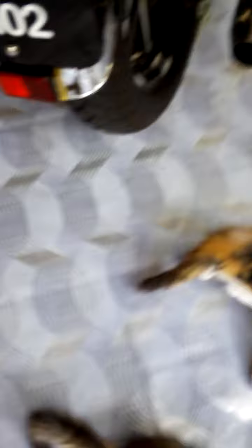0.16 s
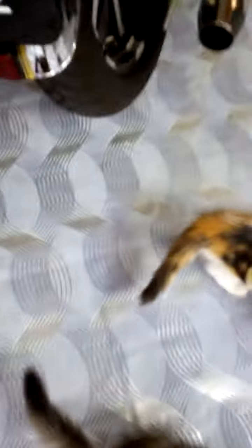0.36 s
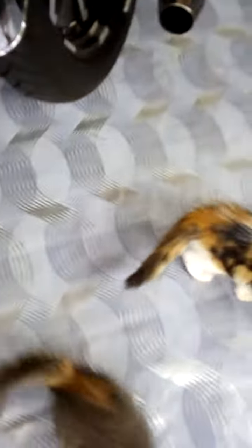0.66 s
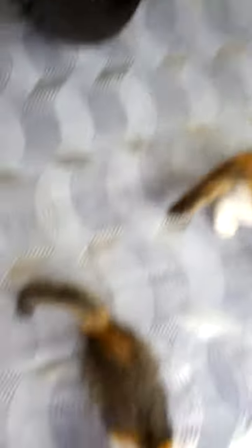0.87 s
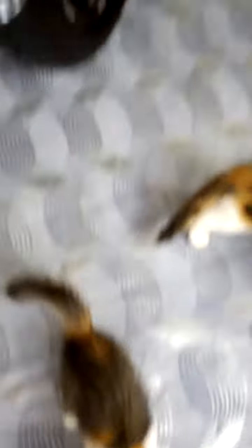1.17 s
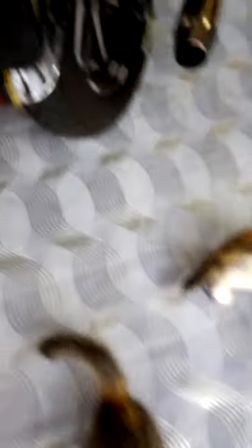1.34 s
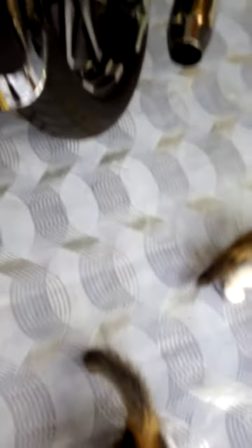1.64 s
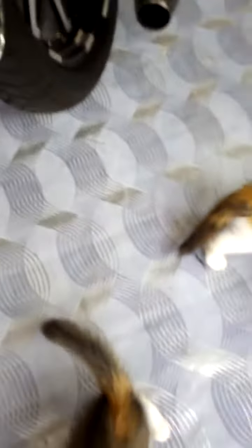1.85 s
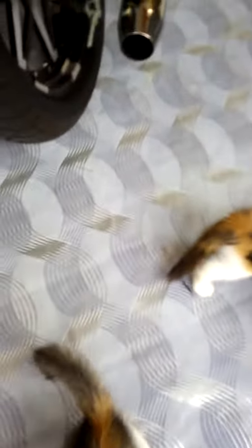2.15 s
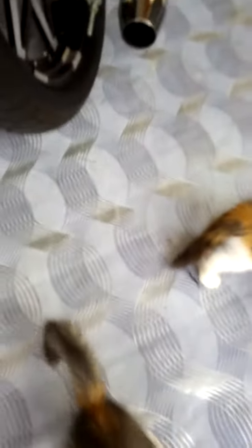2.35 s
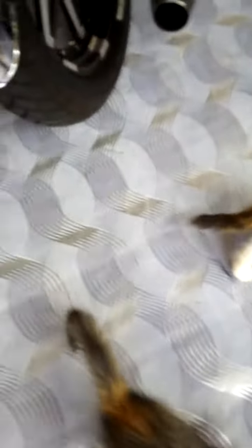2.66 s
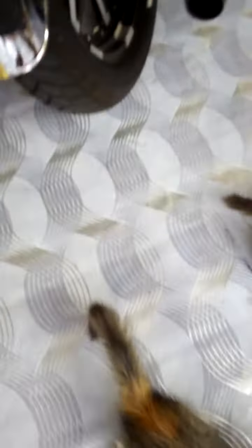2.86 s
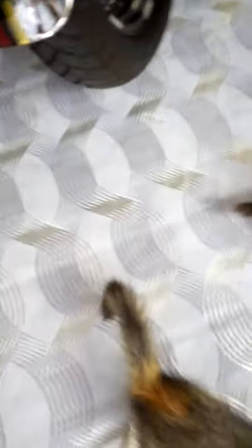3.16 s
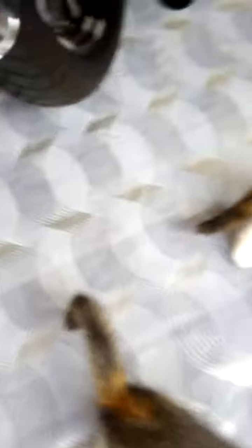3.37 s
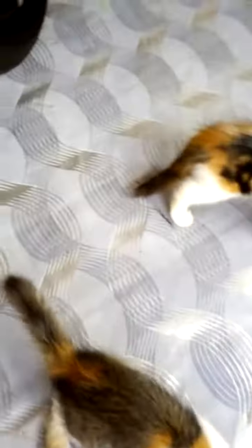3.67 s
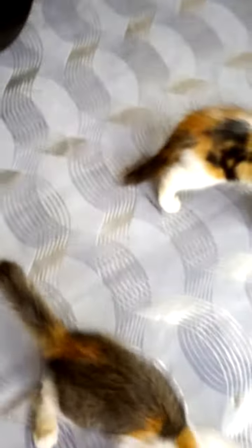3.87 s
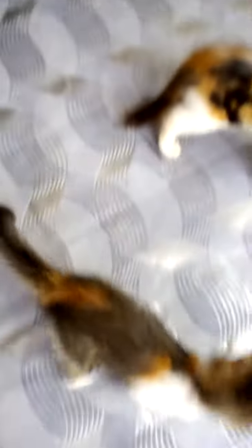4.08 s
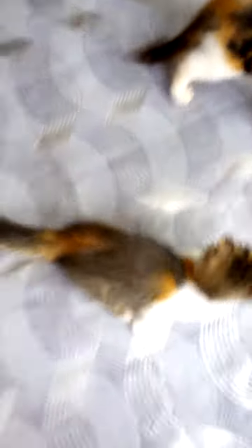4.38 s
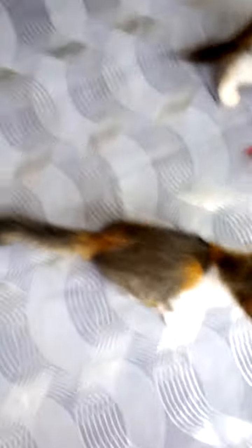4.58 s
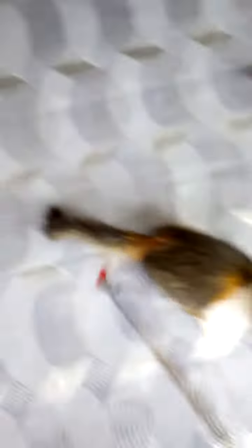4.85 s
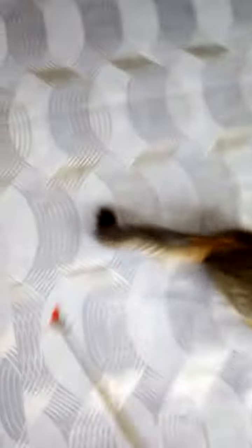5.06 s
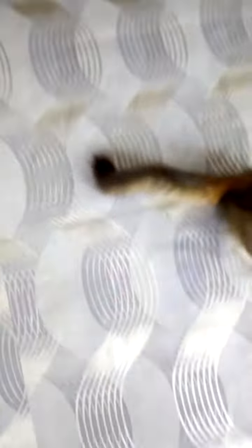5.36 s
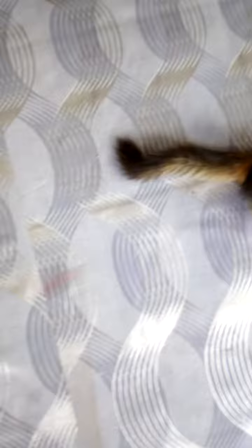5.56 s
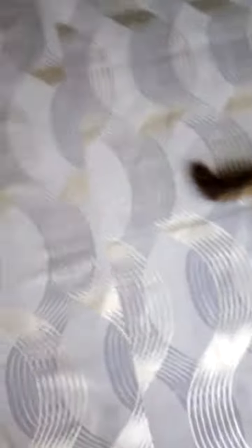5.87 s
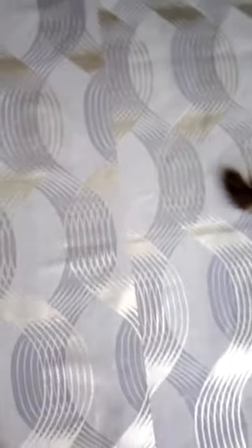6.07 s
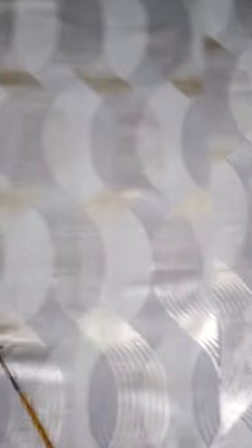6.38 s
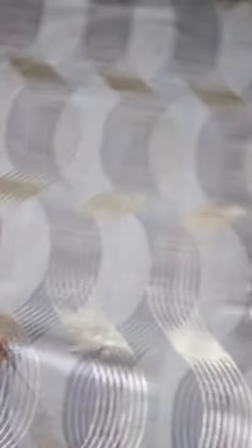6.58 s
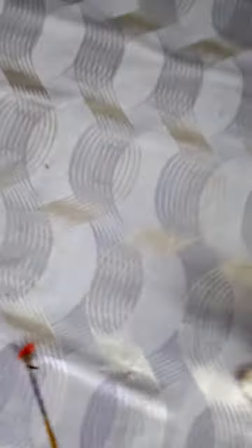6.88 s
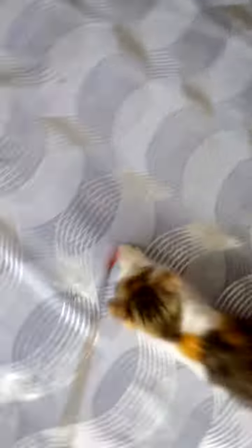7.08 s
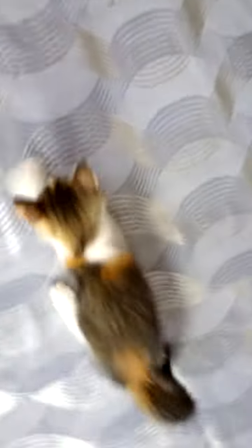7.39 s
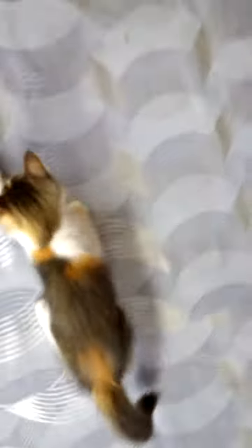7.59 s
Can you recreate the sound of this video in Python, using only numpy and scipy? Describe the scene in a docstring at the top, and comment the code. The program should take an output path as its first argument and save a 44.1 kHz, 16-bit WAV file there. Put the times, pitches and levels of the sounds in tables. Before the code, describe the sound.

A quiet indoor space with a faint low hum and steady soft hiss. At the start there is a soft puff and a slight scrape, then from 0.2 to 0.6 s crisp plastic snaps and short claw scratches. After a pause, sharp crackles at 1.2 s and a scrabbling cluster from 1.45 to 2 s. Brief lighter crinkles come around 2.5 s, with a dull soft paw thud near 2.7. From 3.3 to 3.8 s a dense flurry of scrapes and snaps mixes with a thin high sliding hiss and a slight wavering whistle, fading by about 4.1 s. Only tiny ticks and faint puffs remain until 5.2 s. Then vigorous scratching and bright, hard snaps run almost continuously to 6.6 s. After a short lull, final pounces from 7.1 to 7.6 s crackle with a hollow ring. Close, dry, with short sparse reflections from hard walls.

```python
"""A low hum and a steady background hiss are heard first, with a soft puff, a brief scrape and faint ticks.
Kittens pounce and scrabble on a stiff plastic floor sheet in a small, hard room: creases snap (impulses
through sheet resonances), claws scrape (stick-slip clicks through the same kind of resonances), and
something light slides over the sheet with a thin hiss (a patter of bumps) and a whistle (resonant noise).
Sparse, decaying reflections give the room; the last leaps ring on a hollow fold."""
import sys
import numpy as np
from scipy import signal
from scipy.fft import rfft, irfft
from scipy.io import wavfile
from scipy.ndimage import uniform_filter1d

SR = 44100
rng = np.random.default_rng(int(sys.argv[2]) if len(sys.argv) > 2 else 0)


def wrap_up_sound(samples):
    """Save the sound to the file named by the first command line argument, as 16-bit audio."""
    columns = np.atleast_2d(samples).T
    # keep every value between -1 and 1, then stretch to whole-number steps
    tamed = np.clip(columns, -1, 1)
    steps = np.round(tamed * 32767).astype(np.int16)
    wavfile.write(sys.argv[1], SR, steps)


N = 340893

# steady background hiss: room air, with faint recorder noise near 15 kHz: f/Hz, relative level/dB
BACKGROUND_SPECTRUM = [(15, -49.5), (28, -24.5), (60, -12.5), (102, -4.5), (156, -14.5), (302, -19),
                       (495, -22.5), (774, -24), (1600, -29), (2340, -35), (5980, -36.5), (7700, -50.5),
                       (13500, -52), (15200, -45)]
# partials of the hum: f/Hz, width at half amplitude/Hz, level/dB before the hum trim
HUM_PARTIALS = [(65.4, 25, -66.5), (93.3, 11, -66.5), (109.7, 12, -68.5), (136.6, 5.1, -72),
                (266.2, 51, -75), (620, 18, -103)]
# soft paws land and the loose sheet flaps on the floor: t/s, length/s (cut at 0.4 s), level/dB, f/Hz
PAD_LANDINGS = [(0, 0.079, -61, 1166), (2.687, 0.079, -57.5, 60), (4.295, 0.22, -61, 90),
                (5.761, 0.32, -58.5, 68), (5.951, 0.11, -65.5, 1060), (6.046, 0.12, -64, 577),
                (7.003, 0.091, -57.5, 88.4), (7.298, 0.11, -65, 710), (7.643, 0.51, -65, 275)]
# a paw skids or presses the sheet: t/s, length/s (sounded for 2.3 to 93 ms), level/dB, centre f/Hz
SKIDS = [ (0, 0.027, -41.5, 4300), (0.31, 0.032, -30.5, 4400), (0.436, 0.013, -51, 4100),
         (0.597, 0.014, -32.5, 3220), (0.969, 0.093, -65, 3850), (1.488, 0.028, -35, 2800),
         (1.527, 0.0075, -28, 4100), (1.635, 0.0077, -31, 3600), (1.804, .03, -48.5, 3600),
         (1.83, 0.009, -36, 5000), (1.915, .05, -42.5, 3750), (1.96, 0.021, -33.5, 4000),
         (2.44, 0.01, -53, 5100), (2.451, 0.031, -44.5, 3000), (2.561, 0.029, -50, 3070),
         (3.257, .021, -46.5, 2300), (3.302, 0.041, -39, 4900), (3.389, 0.045, -38, 2900),
         (3.424, 0.019, -29, 4400), (3.518, 0.095, -40.5, 3440), (3.586, 0.056, -32.5, 3510),
         (3.69, 0.068, -34, 3900), (3.756, 0.034, -36, 2700), (4.641, 0.14, -69, 2000),
         (5.2213, 0.0085, -32.5, 3500), (5.377, 0.056, -58, 5000), (5.41, 0.013, -28, 3700),
         (5.444, 0.011, -26.5, 4400), (5.52, 0.0099, -34, 2300), (5.606, .024, -30.5, 3800),
         (5.667, 0.089, -50, 2320), (5.758, 0.05, -40, 3500), (5.778, 0.023, -30, 2900),
         (5.826, 0.037, -41, 2800), (5.958, 0.015, -33, 2800), (6.048, 0.013, -31.5, 1980),
         (6.142, 0.022, -30.5, 3000), (6.303, 0.02, -35, 3300), (6.332, 0.027, -34.5, 3800),
         (6.378, 0.028, -39.5, 3900), (6.476, 0.029, -34, 3900), (6.519, 0.0094, -28.5, 3100),
         (6.562, 0.016, -39, 2400), (6.711, 0.015, -58.5, 2080), (6.958, .068, -68, 4000),
         (7.097, 0.048, -40, 3020), (7.139, 0.023, -31, 2120), (7.332, 0.034, -42.5, 2400),
         (7.43, 0.011, -37.5, 3800), (7.517, 0.027, -33.5, 2080), (7.642, 0.0099, -36, 3450)]
# a crease snaps or a claw taps: t/s, level/dB before the snap trim, centre f/Hz
CREASE_SNAPS = [ (0.2274, -28.5, 3170), (0.2724, -31, 3870), (0.283, -26, 4300), (0.2925, -27, 3100),
                (0.347, -21.5, 4440), (0.9593, -41.5, 3630), (1.1968, -18.5, 4600), (1.202, -26.5, 4300),
                (1.3364, -44, 2540), (1.4637, -18, 3970), (1.5433, -21, 4540), (1.558, -27, 3530),
                (1.6047, -36.5, 3330), (1.653, -27, 4540), (1.7246, -35.5, 3830), (1.845, -27.5, 4160),
                (1.8627, -22, 2860), (1.8797, -32, 3850), (2.4566, -27, 2850), (2.4579, -25.5, 5190),
                (3.3054, -30, 5070), (3.3986, -28.5, 2600), (3.4133, -31, 2850), (3.457, -23.5, 3350),
                (3.6712, -22.5, 4860), (3.7345, -19, 4770), (3.9615, -37.5, 2830), (4.13, -53.5, 4370),
                (4.2928, -46.5, 4700), (4.426, -43, 4800), (4.4664, -39.5, 4550), (5.2336, -21.5, 5200),
                (5.4068, -20, 6740), (5.5278, -18.5, 2880), (5.5887, -19, 4580), (5.9544, -16.5, 4470),
                (6.0437, -23.5, 3900), (6.125, -28, 2700), (6.1603, -20, 4070), (6.304, -24.5, 3620),
                (6.463, -23.5, 3340), (6.8195, -49, 5080), (7.0807, -25, 2900), (7.2999, -33.5, 2480),
                (7.3132, -27, 2500), (7.452, -29, 4000)]
# the harder a crease snaps, the more it cracks outside its own band: snap level/dB, skirt level/dB
CRACK_SKIRT = [(-31.5, -29), (-14.5, -18)]
# weight on the paws, creeping narrow and pouncing wide: t/s, spread/octaves (standard deviation of power)
PAW_WEIGHT = [(0, 0.54), (.33, 0.3), (.6, 0.47), (1.2, .24), (1.46, 0.26), (1.55, 0.32), (2, 0.37),
              (2.46, .1), (2.57, 0.28), (3.3, 0.54), (3.6, 0.24), (3.8, 0.41), (4.6, 0.26), (5.22, 0.3),
              (5.4, 0.61), (6.5, 0.7), (7.7, 0.65)]
# the band in which the plastic radiates: f/Hz, relative level/dB
SHEET_RADIATION = [(300, -14.5), (900, -22.5), (1200, -9.5), (1450, -3.5), (1700, -2.5), (2200, 2),
                   (2800, -1), (4000, -1), (5500, 2.5), (6500, -5.5), (7200, -16.5), (8000, -29.5),
                   (11000, -35.5), (15000, -37)]
# the light slide, then a faint second pass: t/s, hiss level/dB, whistle level/dB, both before the waver
SLIDE_LEVELS = [(3.33, -83, -98), (3.39, -47, -70), (3.55, -47.5, -74.5), (3.65, -44.5, -64.5),
                (3.85, -55.5, -58), (4.04, -55.5, -75), (4.16, -84, -96), (4.2, -78, -72),
                (4.35, -74, -105), (4.56, -77, -110), (4.66, -62, -110), (5.03, -74.5, -110)]
# colour of the sliding hiss: f/Hz, relative level/dB
HISS_SPECTRUM = [(1000, -19.5), (2100, -22), (4200, -18.5), (4650, -4.5), (5150, 5.5), (5600, -3),
                 (6150, -4.5), (7400, -25.5), (7950, -25), (8300, -16), (8700, -24.5), (11000, -68),
                 (15000, -62)]
# resonances of the whistle: f/Hz, width at half amplitude/Hz, level/dB added to the whistle level
WHISTLE_RESONANCES = [(5440, 890, 10), (8275, 45, -5)]

TAPS = 2048  # length of a sheet response, samples
EDGE_HZ = 15650  # upper band limit
BACKGROUND_DB, HUM_TRIM_DB, SNAP_TRIM_DB = -63, -1, -3.5
SKID_WIDENS = 1.08  # spread of a skid over that of a firm snap
# after each skid the paw drags on lightly, at a level relative to the skid
DRAG_S, DRAG_DB = .05, -23
# a light tap rings one small facet only; from FIRM_DB on, a snap sounds the whole band
LIGHT_DB, FIRM_DB, FACET_OCTAVES = -42, -33.5, .075
# claws catch at random in a skid (level relative to it); once it ends, catches weaken as the sheet settles
CATCH_DB, CATCH_SCATTER_DB, CATCH_OCTAVES = 0.5, 2.5, .35
SETTLE_S, SETTLE_DB_PER_S = .025, 450
# uneven pressure of the sliding touch: how fast, and the rms waver of hiss and whistle
WAVER_HZ, WAVER_HISS_DB, WAVER_WHISTLE_DB = 9, 0.5, 8
# the last leaps land on a raised fold, which rings hollow; the width is that of one resonator pass
FOLD_FROM_S, FOLD_HZ, FOLD_WIDTH_HZ, FOLD_DB = 7.0, 1670, 460, 10


def amp(db):
    """Level to amplitude: 20 dB for each factor of ten."""
    return 10 ** (np.asarray(db) / 20)


def unit(x):
    """Normalization to unit rms."""
    return x / np.sqrt(np.mean(x ** 2) + 1e-20)


def read(points, hz):
    """Spectral envelope in dB, linear over log frequency."""
    f, db = np.transpose(points)
    return np.interp(np.log(hz + 1), np.log(f + 1), db)


def add(mix, s, sound):
    """Superposition: a sound is summed into the mix from time s."""
    part = mix[max(round(s * SR), 0):][:len(sound)]
    part += sound[:len(part)]


def noise(gain):
    """Spectral shaping: white noise weighted by a gain at each frequency, at unit rms."""
    return unit(irfft(rfft(rng.standard_normal(N)) * gain, N))


def narrow(hz, width_hz):
    """Resonance: noise through one steep peak becomes a fuzzy tone."""
    detuning = (np.fft.rfftfreq(N, 1 / SR) - hz) / width_hz * 2
    return noise(1 / (1 + detuning ** 2))


def patch(centre_hz, spread, ripple_db, mode_gap_hz, skirt_db=-29):
    """Modal radiation: a sheet patch responds in a hump about its centre, rippled by its own modes."""
    hz = np.fft.rfftfreq(TAPS, 1 / SR) + 1
    hump = np.exp(-(np.log2(hz / centre_hz) / spread / 2) ** 2) + amp(skirt_db)
    ripple = np.interp(hz / mode_gap_hz, np.arange(TAPS), rng.standard_normal(TAPS))
    radiation = amp(read(SHEET_RADIATION, hz) + ripple_db * ripple)
    gain = hump / np.sqrt(hz + centre_hz) * radiation
    log_gain = np.log(np.maximum(gain / gain.max(), 1e-5))
    circle = np.concatenate([log_gain, log_gain[-2:0:-1]])
    # minimum phase makes the response causal: sharp front, short ring
    return np.fft.ifft(np.exp(np.conj(signal.hilbert(circle)))).real


def spread_at(s):
    """Loading: the weight on the paw at time s sets the spread in octaves of the band it sounds."""
    return np.interp(s, *np.transpose(PAW_WEIGHT))


def background():
    """Stationary noise: a steady shaped hiss, and a low hum of narrow bands whose envelopes waver."""
    hiss_gain = amp(read(BACKGROUND_SPECTRUM, np.fft.rfftfreq(N, 1 / SR)))
    hiss = amp(BACKGROUND_DB) * noise(hiss_gain)
    hum = sum(amp(db + HUM_TRIM_DB) * narrow(hz, width) for hz, width, db in HUM_PARTIALS)
    return hiss + hum


def pads(octaves=0.42, rise=0.047):
    """Air displacement: a landing pushes air from under the sheet, a dull puff that swells fast and dies."""
    out, hz = np.zeros(N), np.fft.rfftfreq(SR // 2, 1 / SR) + 1
    for s, length, db, centre_hz in PAD_LANDINGS:
        band = np.exp(-(np.log2(hz / centre_hz) / octaves) ** 2)
        puff = irfft(rfft(rng.standard_normal(SR // 2)) * band)
        count = int(np.clip(length, .01, .4) * SR)
        progress = np.arange(count) / (length * SR)
        envelope = np.minimum(progress / rise, 1) * (1 - progress)
        add(out, s, amp(db) * unit(puff[:count] * envelope))
    return out


def strokes():
    """Sliding friction: each skid, and the light drag that follows it, with the spread of its band."""
    drags = [(s + length, DRAG_S, db + DRAG_DB, hz) for s, length, db, hz in SKIDS]
    return [(s, length, db, hz, SKID_WIDENS * spread_at(s)) for s, length, db, hz in SKIDS + drags]


def scrapes(slips_per_s=1900, size_db=3, rub=0.2, taper=0.063, catch_db=2.5, catch_s=0.00431):
    """Stick-slip friction: dense, uneven clicks, swelling where the claw grips, excite the sheet."""
    out = np.zeros(N)
    for s, length, db, hz, spread in strokes():
        count = int(np.clip(length * SR, TAPS / 20, 2 * TAPS))
        chance, size = rng.random((2, count))
        grit, grip = rng.standard_normal((2, count))
        slip_size = amp(size_db * np.minimum(-np.log(size + 1e-9), 3))
        slips = (chance < slips_per_s / SR) * np.sign(grit) * slip_size
        # the grip changes smoothly between random values catch_s apart
        catch = amp(catch_db * np.interp(np.arange(count) / (catch_s * SR), np.arange(count), grip))
        drive = (slips + rub * grit) * catch * signal.windows.tukey(count, taper)
        scrape = signal.fftconvolve(drive, patch(hz, spread, ripple_db=3.5, mode_gap_hz=215.3))
        add(out, s, amp(db) * np.sqrt(count) * scrape / np.linalg.norm(scrape))
    return out


def crinkles(level_db=-76, ticks_per_s=34, size_db=7.5, count=8):
    """Stress relaxation: the trodden sheet gives faint, scattered ticks, louder during the slide."""
    out, t = np.zeros(N), np.arange(N) / SR
    for hz in np.geomspace(3400, 5600, count):
        tick_size = amp(size_db * np.minimum(rng.exponential(1, N), 3))
        ticks = (rng.random(N) < ticks_per_s / count / SR) * tick_size
        ring = patch(hz, .25, ripple_db=3, mode_gap_hz=300)
        out += signal.oaconvolve(ticks, unit(ring))[:N]
    sliding = (t > SLIDE_LEVELS[0][0]) & (t < SLIDE_LEVELS[-1][0])
    return amp(level_db) * unit(out) * np.where(sliding, 1, .4)


def room(x, wet_db=-9, t60_low=0.25, t60_high=0.29, first_s=0.0068, wander_hz=.7, count=3):
    """Reverberation: close, hard walls reflect sparsely, in a pattern that shifts as the kittens move."""
    out = np.zeros(N)
    for k in range(count):
        # about 3000 reflections a second, none before first_s
        taps = rng.standard_normal(SR // 2) * (rng.random(SR // 2) < 3000 / SR)
        taps[:int(first_s * SR)] = 0
        hz, t, z = signal.stft(taps, SR, nperseg=256)
        t60 = np.interp(hz, [1500, 6500], [t60_low, t60_high])  # seconds to decay by 60 dB
        tail = signal.istft(z * amp(-60 * t / t60[:, None]), SR, nperseg=256)[1]
        phase = 2 * np.pi * wander_hz * np.arange(N) / SR + np.pi * k / count
        share = np.sqrt(2 / count) * np.cos(phase)
        out += signal.oaconvolve(x * share, tail / np.linalg.norm(tail))[:N]
    return amp(wet_db) * out


def creases(count=2):
    """Buckling events: the single snaps, and the claws that catch about each skid, with their spreads."""
    rows = []
    for s, db, hz in CREASE_SNAPS:
        spread = np.interp(db, [LIGHT_DB, FIRM_DB], [FACET_OCTAVES, spread_at(s)])
        rows.append((s, db, hz, spread))
    for s, length, db, hz in SKIDS:
        for when, size, shift in rng.random((count, 3)):
            delay = when * (length + SETTLE_S)
            settling_db = SETTLE_DB_PER_S * max(delay - length, 0)
            catch_db = db + CATCH_DB + CATCH_SCATTER_DB * (2 * size - 1) - settling_db
            catch_hz = hz * 2 ** (CATCH_OCTAVES * (2 * shift - 1))
            rows.append((s + delay, catch_db, catch_hz, spread_at(s)))
    return rows


def snaps():
    """Impulsive buckling: each crease flips at once, then flutters for a millisecond or two."""
    flutter, settle_s = .2, .0015
    span_s = .003  # the level is the rms that the snap's energy has over this span
    out, t = np.zeros(N), np.arange(TAPS) / SR
    for s, db, hz, spread in creases():
        push = flutter * rng.standard_normal(TAPS) * np.exp(-t / settle_s)
        push[0] += 1
        skirt_db = np.interp(db, *np.transpose(CRACK_SKIRT))
        response = patch(hz, spread, ripple_db=5.0, mode_gap_hz=323.7, skirt_db=skirt_db)
        snap = signal.fftconvolve(push, response)
        add(out, s, amp(db + SNAP_TRIM_DB) * np.sqrt(span_s * SR) * snap / np.linalg.norm(snap))
    return out


def slide(grain_db=2.0, grain_s=0.0029, bumps_per_s=2500, rub=0.16):
    """Roughness excitation: a touch on embossed plastic patters into a hiss, with a thin, resonant whistle."""
    s, hiss_db, whistle_db = np.transpose(SLIDE_LEVELS)
    t, hz = np.arange(N) / SR, np.fft.rfftfreq(N, 1 / SR)
    roughness = uniform_filter1d(rng.standard_normal(N), int(grain_s * SR))
    grain = uniform_filter1d(amp(grain_db * unit(roughness)), size=40)
    bumps = rng.standard_normal(N) * (rub + (rng.random(N) < bumps_per_s / SR))
    hiss = unit(irfft(rfft(bumps) * amp(read(HISS_SPECTRUM, hz)), N))
    hiss *= amp(np.interp(t, s, hiss_db))
    whistle = sum(amp(db) * narrow(f, width) for f, width, db in WHISTLE_RESONANCES)
    whistle *= amp(np.interp(t, s, whistle_db))
    touch = noise(np.exp(-(hz / WAVER_HZ) ** 2))  # slow random pressure
    wavering = hiss * amp(WAVER_HISS_DB * touch) + whistle * amp(WAVER_WHISTLE_DB * touch)
    return wavering * grain * (t > s[0]) * (t < s[-1])


def fold(x):
    """Cavity resonance: the hollow under the fold rings along with the paws that land on it."""
    b, a = signal.iirpeak(FOLD_HZ, FOLD_HZ / FOLD_WIDTH_HZ, SR)
    landed = x * (np.arange(N) / SR > FOLD_FROM_S)
    ringing = signal.lfilter(b, a, signal.lfilter(b, a, landed))  # two passes steepen the skirts
    return amp(FOLD_DB) * ringing


def scene():
    """Superposition: everything on the sheet sounds into the room, over the background hiss and hum."""
    paws = snaps() + scrapes()
    plastic = paws + fold(paws) + pads() + crinkles() + slide()
    return (plastic + room(plastic) + background())[None]


def record(dry):
    """Band limitation: a linear-phase low-pass removes what lies above EDGE_HZ."""
    low_pass = signal.firwin(511, EDGE_HZ, window=("kaiser", 9), fs=SR)
    return signal.oaconvolve(dry, low_pass[None], "same")


dry = scene()
out = record(dry)
wrap_up_sound(out)
```